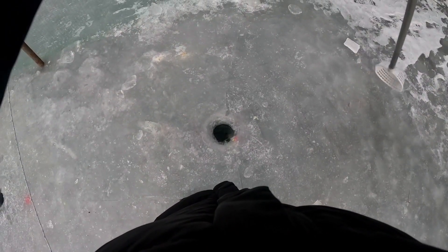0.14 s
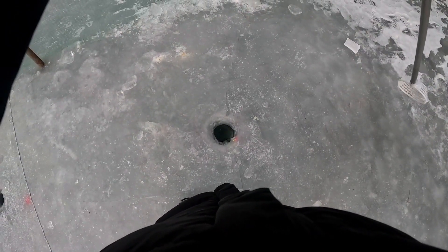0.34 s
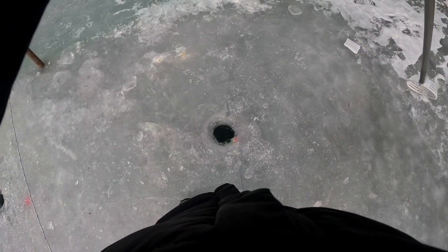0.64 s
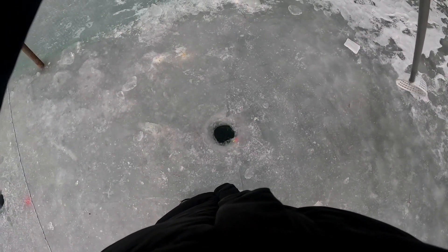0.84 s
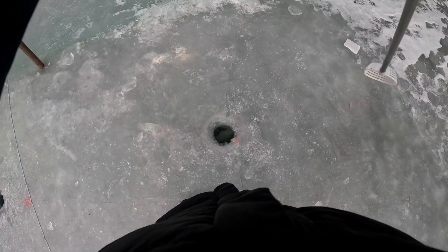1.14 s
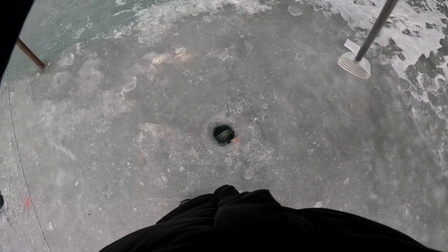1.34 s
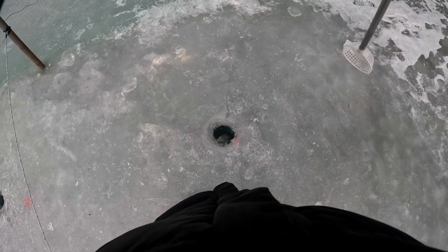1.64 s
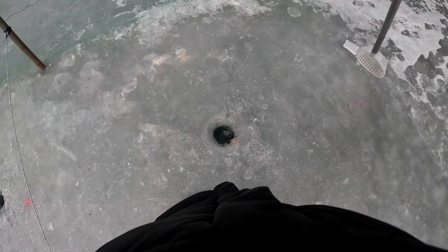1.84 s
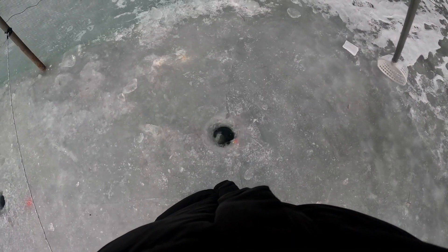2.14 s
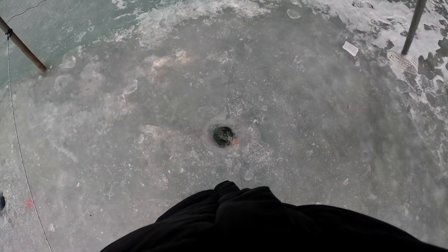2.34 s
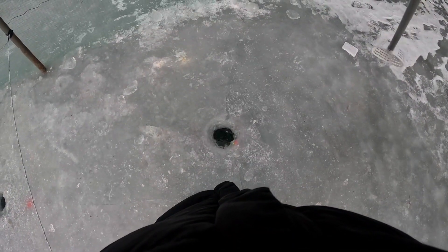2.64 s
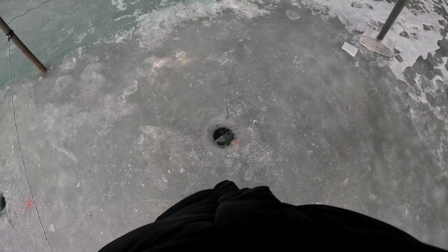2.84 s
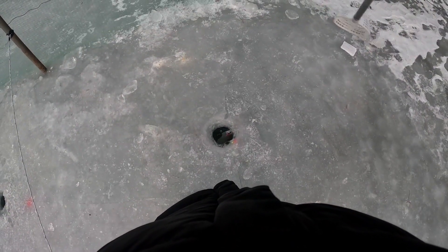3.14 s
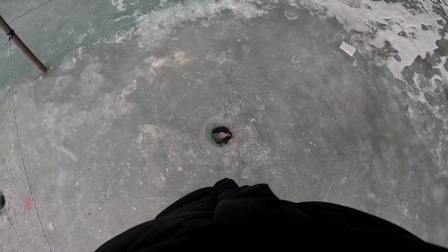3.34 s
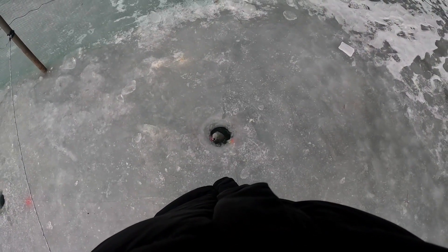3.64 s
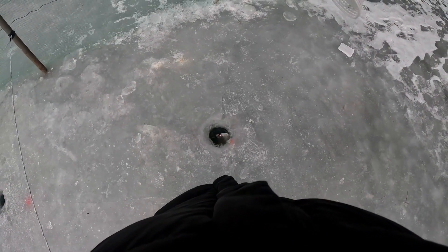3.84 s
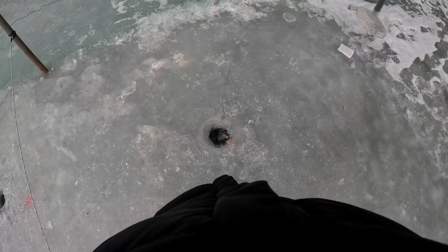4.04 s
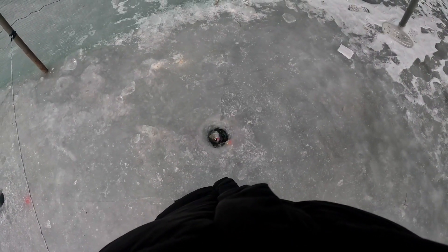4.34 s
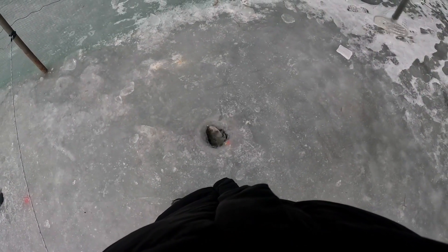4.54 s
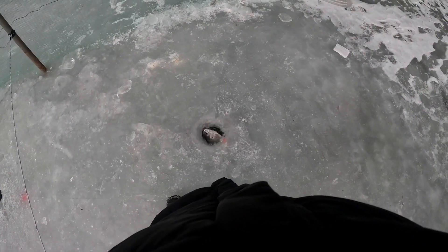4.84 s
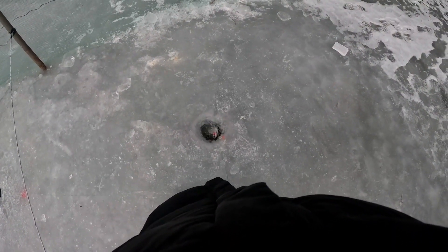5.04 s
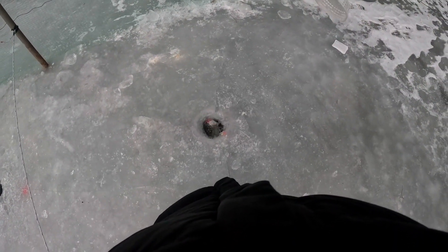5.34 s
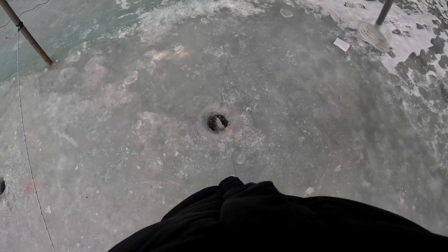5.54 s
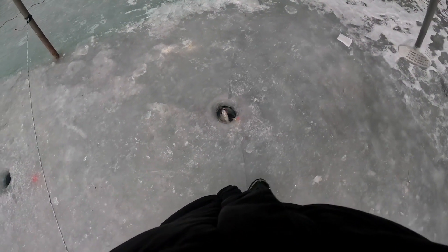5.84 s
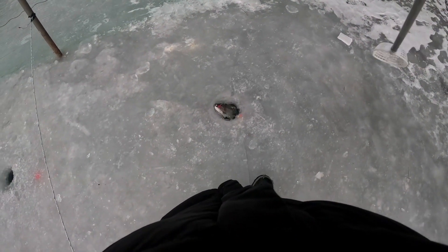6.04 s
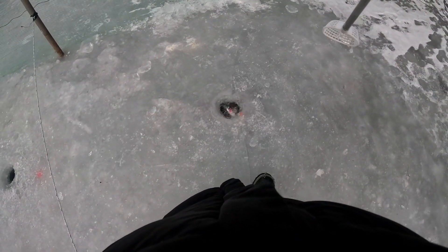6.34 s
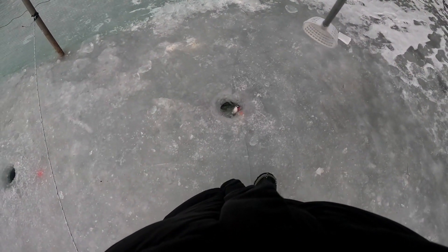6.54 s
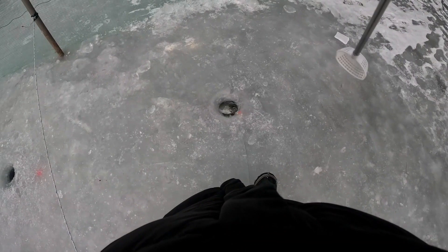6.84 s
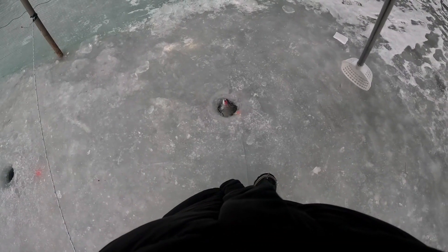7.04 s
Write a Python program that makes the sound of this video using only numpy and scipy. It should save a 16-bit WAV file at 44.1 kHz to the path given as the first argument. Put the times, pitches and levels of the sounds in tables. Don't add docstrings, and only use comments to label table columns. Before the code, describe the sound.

A fishing reel winds line in uneven, fast ticking surges while wind rumbles and faint watery blips sound from an ice hole; a knock finishes.

```python
import sys
import numpy as np
from scipy import signal
from scipy.fft import rfft, irfft, next_fast_len
from scipy.io import wavfile
from scipy.ndimage import uniform_filter1d

SR = 44100
rng = np.random.default_rng(int(sys.argv[2]) if len(sys.argv) > 2 else 0)


def level_to_linear(level):
    exponent = np.asarray(level, float) / 20
    return 10 ** exponent


def log_audio(samples):
    frames = np.atleast_2d(samples).T
    limited = np.clip(frames, -1, 1)
    pcm = np.round(limited * 32767).astype(np.int16)
    wavfile.write(sys.argv[1], SR, pcm)


N = 316638


def resonance(x, hz, width_hz):
    return signal.lfilter(*signal.iirpeak(hz, hz / width_hz, fs=SR), x)


def ring(x, hz, width_hz):
    for _ in range(3):
        x = resonance(x, hz, width_hz)
    return x


def lowpass(x, hz):
    return signal.sosfiltfilt(signal.butter(3, hz, fs=SR, output="sos"), x)


def unit(x):
    return x / np.sqrt(np.mean(x ** 2))


def even(x, window_s):
    return unit(x / (0.24 + np.sqrt(uniform_filter1d(x ** 2, int(window_s * SR)))))


def curves(table):
    s, *columns = np.transpose(table)
    return [np.interp(np.arange(N) / SR, s, c) for c in columns]


def lumps(at_s, length_s):
    s = np.arange(0, N + 100, 100) / SR
    return np.exp(-((s - np.c_[at_s]) / np.c_[length_s]) ** 2)


def smooth(x):
    return np.interp(np.arange(N), 100 * np.arange(len(x)), x)


def swells(table, rest_db):
    s, db, length_s = np.transpose(table)
    power = level_to_linear(2 * db) @ lumps(s, np.maximum(length_s, .01)) ** 2
    return smooth(10 * np.log10(power + level_to_linear(2 * rest_db)))


def coloured(spectrum):
    hz, db = np.transpose(spectrum)
    size = next_fast_len(N)
    bins = np.fft.rfftfreq(size, 1 / SR) + 1
    gain = level_to_linear(np.interp(np.log(bins), np.log(hz), db, left=-90, right=-90))
    return unit(irfft(rfft(rng.standard_normal(size)) * gain, size)[:N])


def walk(rate_hz):
    k = int(SR / rate_hz)
    held = np.repeat(rng.standard_normal(N // k + 1), k)
    return unit(uniform_filter1d(uniform_filter1d(held, k), k)[:N])


def pair(mid, side, pan_db):
    return np.array([level_to_linear(pan_db / 2) * (mid + side), level_to_linear(-pan_db / 2) * (mid - side)])


def bursts(at, size, fall_s, rise_s):
    kicks = np.zeros(N)
    kicks[at] = size
    s = np.arange(600) / SR
    shape = np.exp(-s / fall_s) * (1 - np.exp(-s / rise_s))
    return signal.oaconvolve(kicks, shape)[:N] * rng.standard_normal(N)


# (frequency [Hz], level [dB per Hz])
AIR_SPECTRUM = [(2000, 2.5), (2600, 9), (5200, 4.5), (9300, -1.5), (10200, -37), (11600, -43), (13000, -14),
                (15000, -27), (16000, -60)]
AIR_DB = -71


def air():
    return pair(coloured(AIR_SPECTRUM), 1.07 * coloured(AIR_SPECTRUM), .5) * level_to_linear(AIR_DB)


# (frequency [Hz], level [dB per Hz])
BUFFET_SPECTRUM = [(12, -39), (18, 2), (25, 4), (33, 0), (42, -7), (55, -40), (90, -50), (200, -120)]
# (time [s], level [dB], length [s])
GUSTS = [(0.0, -31.5, 0.025), (0.13, -31, 0.086), (0.37, -33.5, 0.048), (0.56, -39, 0.051),
         (0.83, -25, 0.034), (1.07, -33, 0.055), (1.24, -47, 0.037), (1.38, -30.5, 0.075),
         (1.55, -30.5, 0.074), (1.8, -49, 0.05), (1.94, -50, 0.054), (2.04, -47, 0.068), (2.25, -32, 0.048),
         (2.49, -39, 0.077), (2.69, -38, 0.052), (2.83, -40.5, 0.061), (2.96, -25, 0.046),
         (3.2, -31.5, 0.039), (3.36, -42.5, 0.047), (3.68, -31.5, 0.071), (3.92, -37.5, 0.057),
         (4.09, -44, 0.034), (4.4, -31.5, 0.06), (4.55, -39.5, 0.077), (4.63, -40, 0.033), (4.98, -39, 0.1),
         (5.12, -26.5, 0.039), (5.35, -33, 0.059), (5.47, -46, 0.06), (5.55, -57, 0.054),
         (5.84, -28.5, 0.049), (5.98, -28.5, 0.079), (6.08, -27, 0.061), (6.28, -33, 0.075),
         (6.44, -38, 0.044), (6.61, -26.5, 0.045), (6.91, -60, 0.05), (7.0, -44.5, 0.015)]
LULL_DB = -49.5


def buffet():
    lump = lowpass(even(coloured(BUFFET_SPECTRUM), .06), 50)
    return pair(lump, 0.0092 * coloured(BUFFET_SPECTRUM), -0.27) * level_to_linear(swells(GUSTS, LULL_DB) + 1.0)


# (time [s], level [dB], length [s])
PUFFS = [(0.03, -50.5, 0.1), (0.37, -50.5, 0.23), (0.63, -52, 0.059), (0.79, -51, 0.082),
         (1.24, -56.5, 0.3), (1.52, -56.5, 0.12), (1.65, -54, 0.057), (1.77, -51.5, 0.036),
         (1.94, -50.5, 0.065), (2.08, -62, 0.018), (2.27, -45.5, 0.024), (2.46, -55, 0.53),
         (2.65, -49, 0.029), (2.93, -60.5, 0.29), (3.33, -50.5, 0.092), (3.67, -59, 0.058),
         (3.93, -58, 0.072), (4.34, -50.5, 0.035), (4.42, -44.5, 0.032), (4.62, -50, 0.2),
         (4.69, -57, 0.027), (5.07, -54.5, 0.057), (5.34, -57, 0.093), (5.71, -48, 0.023),
         (5.95, -56, 0.27), (6.39, -51, 0.032), (6.54, -52.5, 0.31), (6.54, -49, 0.045), (6.82, -45, 0.034),
         (7.01, -53.5, 0.15)]
CALM_DB = -61


def puff_db():
    return swells(PUFFS, CALM_DB)


# (frequency [Hz], level [dB per Hz])
FLUTTER_SPECTRUM = [(50, -43), (81, -15), (113, -17.5), (150, -14), (220, -16.5), (310, -30.5),
                    (367, -36.5), (500, -42), (650, -81), (1100, -120)]


def flutter():
    grain = level_to_linear(3.8 * walk(55))
    mid = unit(grain * coloured(FLUTTER_SPECTRUM))
    side = 0.13 * grain * coloured(FLUTTER_SPECTRUM)
    return pair(mid, side, 0.19) * level_to_linear(puff_db() + 0.8)


# (frequency [Hz], level [dB per Hz])
HISS_SPECTRUM = [(180, -39), (300, -8), (361, -12), (626, -10.5), (856, -8), (1090, 5.5), (1270, -2),
                 (1660, -8), (1920, -7.5), (2350, -16.5), (2700, -20.5), (3510, -14), (5940, -120)]
# (time [s], level [dB], length [s])
RUSTLES = [(0, -69, 0.035), (.28, -64, 0.033), (.76, -61, 0.036), (.93, -69, 0.046), (1.19, -70.5, 0.066),
           (1.78, -67, .13), (2.26, -65.5, 0.082), (3.3, -74, 0.061), (4.71, -67, 0.2), (5.25, -63.5, 0.11),
           (6.31, -67, 0.071), (6.47, -56, 0.046), (6.58, -57, 0.11)]
HISS_DB, HISS_FOLLOWS = -64.5, 0.17


def hiss():
    wind_db = HISS_DB + HISS_FOLLOWS * (puff_db() - CALM_DB)
    level = np.hypot(level_to_linear(wind_db + 0.47), level_to_linear(swells(RUSTLES, -90)))
    mid = unit(level_to_linear(1.45 * walk(25.97)) * coloured(HISS_SPECTRUM))
    return pair(mid, .5 * coloured(HISS_SPECTRUM), 1.3) * level


# (frequency [Hz], level [dB per Hz])
SWAY_SPECTRUM = [(3, -22.5), (6, -0.5), (14, -1), (19, -25.5), (30, -72)]
SWAY_DB = -35
# (frequency [Hz], level [dB per Hz])
THUD_SPECTRUM = [(33, -50), (44, 0), (56, -8), (70, -14.5), (90, -21), (115, -32.5), (140, -51), (200, -90)]
# (time [s], level [dB], length [s])
THUDS = [(0.0, -47, 0.025), (0.07, -43, 0.035), (0.19, -44, 0.033), (0.36, -52, 0.069), (0.49, -56, 0.039),
         (0.57, -47, 0.05), (0.82, -42.5, 0.036), (0.92, -57, 0.054), (1.06, -50, 0.068),
         (1.18, -52, 0.038), (1.26, -58, 0.049), (1.39, -55, 0.031), (1.5, -44, 0.028), (1.66, -53, 0.039),
         (1.79, -51, 0.04), (1.95, -54, 0.03), (2.25, -47, 0.061), (2.48, -43.5, 0.029), (2.64, -45, 0.037),
         (2.94, -43, 0.042), (3.19, -52, 0.036), (3.28, -56, 0.031), (3.63, -43, 0.033), (3.79, -59, 0.04),
         (3.93, -52, 0.054), (4.35, -47, 0.051), (4.68, -45, 0.033), (4.8, -50, 0.043), (5.01, -52, 0.03),
         (5.1, -40.5, 0.034), (5.35, -48, 0.041), (5.72, -49, 0.037), (5.82, -41, 0.051),
         (6.05, -31.5, 0.044), (6.22, -51, 0.059), (6.41, -49, 0.047), (6.58, -39, 0.045),
         (6.81, -47, 0.029), (6.92, -58, 0.035), (7.0, -53, 0.021)]
STILL_DB = -60


def eddies():
    thud = even(coloured(THUD_SPECTRUM), 0.029) * level_to_linear(swells(THUDS, STILL_DB) + 1.0)
    low = thud + coloured(SWAY_SPECTRUM) * level_to_linear(SWAY_DB - 1)
    return pair(low, 0.031 * np.roll(thud, 300), -0.17)


# (time [s], peak [dB], frequency [Hz], glide [share in 15 ms])
BLIPS = [(.678, -50, 1057, 0.082), (1.637, -51, 980, 0.047), (2.638, -36.5, 1078, 0.26),
         (2.652, -54, 1330, .35), (3.278, -50.5, 1140, -0.12), (3.329, -52, 1160, -0.046),
         (4.252, -47.5, 1246, 0), (4.708, -45, 1113, -0.0082), (5.008, -60, 1460, .75),
         (5.012, -56, 1120, 0.062), (5.112, -64, 1850, .45), (5.04, -61, 1910, .15),
         (5.053, -55, 1480, 0.6), (5.078, -47, 1085, .35), (5.128, -50, 935, 0.31), (5.2, -48, 1140, 0.19),
         (5.221, -42.5, 1200, 0.17), (5.222, -51, 1830, .25), (5.24, -52, 1500, .14),
         (5.24, -53, 1950, .065), (5.284, -54, 1600, 0.29), (5.318, -53, 1750, .6),
         (5.337, -41.5, 1300, -0.17), (5.353, -49, 1170, -.1), (5.639, -52, 1170, -.03),
         (5.68, -56, 1090, .2), (5.73, -59, 1340, .17), (5.772, -56, 1890, .22), (5.78, -54, 1500, .16),
         (6.191, -56, 1090, 0.066), (6.309, -49, 1090, -0.0035), (6.465, -44, 1270, .03),
         (6.645, -53, 1150, .05), (6.93, -55, 1550, .095), (7.031, -48, 1085, .093),
         (7.06, -34.5, 1152, 0.012)]
BLIP_CYCLES = 59
BIG_PAN_DB, SMALL_PAN_DB, SMALL_HZ = 3, -12.5, 1410


def blips():
    out, s = np.zeros((2, N + 4000)), np.arange(4000) / SR
    for t, db, hz, glide in BLIPS:
        t60_s = BLIP_CYCLES / hz
        pan_db = BIG_PAN_DB + (SMALL_PAN_DB - BIG_PAN_DB) / (1 + (SMALL_HZ / hz) ** 12)
        fade = np.exp(-np.log(1000) * (s / max(0.53 * t60_s, .01)) ** 2)
        gurgle = unit(signal.oaconvolve(rng.standard_normal(4000), np.hanning(160), "same"))
        shape = (1 - np.exp(-s / 0.0023)) * fade * level_to_linear(2.1 * gurgle)
        sine = np.sin(2 * np.pi * hz * (s + glide * s ** 2 / 0.0334))
        tone = level_to_linear(db) * shape / shape.max() * sine
        i = int(t * SR)
        out[:, i:i + 4000] += pair(tone, 0.28 * np.roll(tone, 9), pan_db)
    return out[:, :N]


# (time [s], peak [dB], left minus right [dB])
CREAKS = [(0.004, -47, -3), (0.665, -54, -2), (0.68, -52, -2), (0.77, -49.5, -2), (4.33, -58, -2),
          (4.689, -61, 1.0), (5.702, -53, -1.5), (5.903, -44.5, 2), (5.952, -42, 2), (5.977, -51, 1.5),
          (5.993, -37.5, 4), (6.016, -38.5, 3), (6.035, -30, 2), (6.404, -53, 1.0), (6.464, -56, -5),
          (6.577, -46, -5), (6.646, -54, 0), (7.104, -30, 1)]
# (frequency [Hz], width [Hz], level [dB])
JACKET_MODES = [(584, 270, -4.5), (757, 172, -6), (1200, 313, 6.1), (1500, 480, -14), (2100, 450, -34)]


def jacket():
    out, s = np.zeros((2, N + 3000)), np.arange(3000) / SR
    for t, db, pan_db in CREAKS:
        slip = 0.021 * np.exp(-s / 0.0077) * rng.standard_normal(3000)
        slip[40] += 1
        slip = signal.oaconvolve(slip, np.hanning(22), "same")
        knock = 0
        for hz, width, mode_db in JACKET_MODES:
            mode = resonance(resonance(slip, hz, 1.5 * width), hz, 1.5 * width)
            knock = knock + level_to_linear(mode_db) * mode * 300 / width
        late = 0.53 * signal.hilbert(knock).imag
        i = int(t * SR)
        out[:, i:i + 3000] += pair(knock, late, pan_db) * level_to_linear(db + 2.5) / np.abs(knock).max()
    return out[:, :N]


# (frequency [Hz], t60 [s], swing [ratio])
ROCK = [(165, .018, 1), (160, .06, .07), (42, .12, -.13), (27, .2, .12)]
BUMP_S, BUMP_DB = 7.1057, -7.3


def bump():
    s = np.maximum(np.arange(N) / SR - BUMP_S, 0)
    rock = 0
    for hz, t60_s, swing in ROCK:
        rock = rock + swing * np.exp(-np.log(1000) * s / t60_s) * np.sin(2 * np.pi * hz * s)
    rock = lowpass(rock * (1 - np.exp(-s / .0015)), 290)
    rock = level_to_linear(BUMP_DB) * rock / np.abs(rock).max()
    return pair(rock, 0.052 * np.roll(rock, 60), -0.22)


# (frequency [Hz], width [Hz], level [dB])
RUBS = [(3200, 390, -75.5), (4910, 300, -79.5), (5550, 810, -81.5)]


def gear_rub(speed):
    grit = rng.standard_normal((2, N)) * (speed / 66) ** 1.5
    out = 0
    for hz, width, db in RUBS:
        out = out + level_to_linear(db) * unit(resonance(resonance(grit, hz, width), hz, width))
    return out


# (time [s], level [dB], length [s])
LOW_RING = [(0.14, -54.5, 0.37), (0.26, -40.5, 0.016), (0.58, -44.5, 0.019), (0.67, -57.5, 0.16),
            (0.96, -52, 0.069), (1.27, -55, 0.14), (1.53, -56.5, 0.1), (1.8, -50.5, 0.083),
            (2.11, -58, 0.32), (2.21, -49.5, 0.021), (2.57, -46.5, 0.04), (2.94, -60.5, 0.21),
            (2.94, -52, 0.018), (3.42, -60, 0.088), (3.75, -55, 0.065), (4.1, -63, 0.13), (4.47, -64, 0.11),
            (4.7, -55, 0.036), (4.86, -56.5, 0.028), (5.14, -60.5, 0.069), (5.43, -57.5, 0.05),
            (5.77, -57.5, 0.058), (6.0, -61, 0.031), (6.32, -57.5, 0.025), (6.56, -64, 0.2),
            (6.84, -52.5, 0.019), (7.2, -52.5, 0.2)]
# (time [s], level [dB], length [s])
HIGH_RING = [(0.13, -71.5, 0.211), (0.27, -58.5, 0.021), (0.53, -74, 0.058), (0.71, -69.5, 0.069),
             (1.32, -75, 0.33), (1.65, -65.5, 0.032), (1.91, -62, 0.039), (2.27, -63.5, 0.39),
             (2.56, -58, 0.025), (2.83, -63, 0.025), (3.04, -70.5, 0.3), (3.4, -61.5, 0.033),
             (3.55, -63, 0.06), (3.81, -67.5, 0.032), (3.91, -70, 0.022), (4.01, -71, 0.038),
             (4.63, -69, 0.36), (5.18, -73, 0.045), (5.69, -71.5, 0.51), (6.3, -71, 0.075),
             (6.52, -62.5, 0.024), (6.75, -74, 0.23), (6.99, -61.5, 0.028), (7.2, -65, 0.13)]
LOW_HELD_DB, HIGH_HELD_DB, GRIP_WANDER_DB = -74, -80, 3


def grip():
    low = swells(LOW_RING, LOW_HELD_DB) + 2.0 + GRIP_WANDER_DB * walk(25)
    high = swells(HIGH_RING, HIGH_HELD_DB) + 2.0 + GRIP_WANDER_DB * walk(25)
    return [low, high]


RING_HZ = [6312, 6408, 9428, 9605, 13752, 14393, 14580]
# (t60 [s], level [dB], low ring 0 or high ring 1 [whole part], left minus right [dB])
RINGS = [(0.092, 10, 0, -0.8), (0.11, -2, 0, -7), (0.17, 8, 1, 0.6), (0.12, -6.5, 1, 6.5),
         (0.16, -31, 0.82, 1), (0.11, -24, 1, 18), (.12, -25, 1, -9)]


def spool_rings(at):
    free_db = grip()
    out, s = np.zeros((2, N)), np.arange(N) / SR
    at = np.r_[0, at]
    last = np.searchsorted(at, np.arange(N), side="right") - 1
    for hz, (t60_s, db, column, pan_db) in zip(RING_HZ, RINGS):
        size_luck, phase_luck, ear_luck = rng.standard_normal((3, len(at)))
        freed_db = free_db[int(column)][np.minimum(at + 300, N - 1)]
        size = level_to_linear(db + freed_db + 2.6 * size_luck)
        fade = np.exp(-np.log(1000) * (s - s[at][last]) / t60_s)
        phase = np.cumsum(1.303 * phase_luck)
        for ear, slip in enumerate((0.1 * ear_luck, -.14 * ear_luck)):
            swing = (size * np.exp(1j * (phase + slip)))[last] * fade
            swing = signal.oaconvolve(swing, np.hanning(120) / 60)[:N]
            out[ear] += level_to_linear(pan_db * (1.0 - ear)) * (swing * np.exp(2j * np.pi * hz * s)).imag
    return out


# (time [s], level [dB])
SNAP_DRIFT = [(0, .5), (1.0, 0), (1.6, -1.5), (2.5, 1.5), (2.9, -2), (3.4, 0), (4.1, -1.5), (4.9, 0.5),
              (5.4, -1.5), (6.2, -2.5), (7.18, 1)]
SLOW_SNAP_DB = 0.5
# (time [s], frame [dB], cover [dB], pawl [dB])
PART_LEVELS = [(0.0, 2.5, 2, 2.5), (0.15, -4.5, -5, 2), (0.31, 2.5, 2, -0.2), (0.46, -4, 0, 3.5),
               (0.61, 2.7, 1, 1.5), (0.76, -4, 1, 1), (0.92, -0.2, -0.5, 2.5), (1.07, 5, 1.5, -0.5),
               (1.22, -0.5, 0, 1), (1.37, 3.2, 3.5, 0.5), (1.53, 2, 3.5, 3.3), (1.68, -1.5, -2, -4.5),
               (1.83, 1.2, -1.5, -3), (1.98, -5, 2, 3.5), (2.14, -4.5, -2.5, -0.5), (2.29, 2, -1, -0.5),
               (2.44, -8, -3.5, -4), (2.59, 1.5, -0.5, 3.5), (2.75, -8.9, 1, -2.4), (2.9, 2, 1, 4.6),
               (3.05, -7.5, 0, 0.5), (3.2, -4.5, 0.5, -1), (3.36, -2, -0.0, 2.2), (3.51, 1.7, 1.2, -6.5),
               (3.66, -0.5, -2.5, -1.5), (3.81, 5, 2, -1.5), (3.97, -1, -2, -7), (4.12, 2, -2, 3),
               (4.27, 5, -2, 0.3), (4.42, -0.5, 1.5, 0), (4.58, 1, -1.1, -2.5), (4.73, -2, -0.5, -2),
               (4.88, -1.5, -3.5, -0.5), (5.03, -5, -1.5, 1.7), (5.19, 0, -1, 0), (5.34, -3.5, 0, 2),
               (5.49, 3, 2.5, -1), (5.64, -3.5, 0.5, 3.2), (5.8, 4.5, 6, 2.5), (5.95, 2.3, -1.5, 1.7),
               (6.1, 2.5, 2, 0.2), (6.25, 2.2, -7.1, 2.5), (6.41, -2, -1, 0), (6.56, 3.5, 3, 2.5),
               (6.71, -0.5, 0.5, 2), (6.86, 2.5, 1, 1.5), (7.02, -3, 1, 2.5), (7.17, 0.5, -1, 2)]
PART_EDGES_HZ = [3600, 6700]
# (time [s], low share [0-1])
TILT = [(0, 0.07), (1.7, .15), (2.0, .0), (3.2, 0.15), (3.6, 0.76), (4.9, 0.94), (5.3, 0.46), (5.9, 0.77),
        (6.5, 0.56), (7.18, 0.3)]
SPRING, SPRING_DROP_HZ = 4, 170
# (frequency [Hz], width [Hz], level [dB],
# once-a-turn swing [dB], its angle [turns], twice-a-turn swing [dB], its angle [cycles],
# left minus right [dB], unlike share [0-1])
BODY = [(3002, 240, -48.5, 3.56, -0.035, .4, 0.0012, -3.5, 0.73),
        (3183, 210, -46, 3.5, -0.18, 0.42, -0.31, -4, 0.17),
        (3907, 367, -46.5, 2.7, 0.51, 2.3, -.26, -1, 0.14),
        (6400, 570, -41.5, 1.4, -0.23, 2, -0.58, -1.5, 0.13),
        (7100, 360, -39.5, 1.9, 0.26, 5.14, 0.31, 5, .3),
        (7750, 297, -41.5, 0.7, -0.23, 5.6, 0.45, 6.5, 0.38),
        (8600, 660, -48.5, .3, .3, 2.1, 0.58, 7, 0.48), (11600, 940, -58, 1.2, -0.099, 1.1, .3, 6.5, 0.7)]
# (frequency [Hz], width [Hz], depth [0-1])
GAPS = [(3570, 220, 0.67), (5300, 260, 0.2)]
TEETH_PER_TURN = 18.08


def body_ticks(speed, teeth, at):
    turn = np.round(teeth[at]) / TEETH_PER_TURN
    snap_db = curves(SNAP_DRIFT)[0][at] + SLOW_SNAP_DB * (66 - speed[at]) / 50
    snap_db = snap_db + .8 * rng.standard_normal(len(at))
    parts_db, tilt = curves(PART_LEVELS), curves(TILT)[0]
    out, opposed = 0, 0
    for row, (hz, width, db, once_db, once, twice_db, twice, pan_db, unlike) in enumerate(BODY):
        swing_db = once_db * np.cos(2 * np.pi * (turn - once))
        swing_db = swing_db + twice_db * np.cos(2 * np.pi * (2 * turn - twice))
        part_db = parts_db[np.searchsorted(PART_EDGES_HZ, hz)][at]
        size = level_to_linear(db + swing_db + snap_db + part_db + 1.54 * rng.standard_normal(len(at)))
        chatter = 0.12 * bursts(at, size, .0018, 0.00024)
        running = level_to_linear(db - 40.5) * (0.36 + speed / 110) * rng.standard_normal(N)
        mid = chatter + running
        mid[at + 8] += size
        if row == SPRING:
            low = ring(np.sqrt(tilt) * mid, hz - SPRING_DROP_HZ, 2.23 * width)
            high = ring(np.sqrt(1 - tilt) * mid, hz + SPRING_DROP_HZ, 2.23 * width)
            mid = low + high
        else:
            mid = ring(mid, hz, 2.19 * width)
        mid = mid * (SR / width) * level_to_linear(-16.5)
        out = out + pair(mid, 0, pan_db)
        opposed = opposed + pair(0, unlike * np.roll(mid, 3), pan_db)
    out = out + opposed * (1 + 0.48 * walk(55))
    for hz, width, depth in GAPS:
        out = out - depth * resonance(out, hz, width)
    return out


# (start [s], teeth wound [count], slack speed at start [teeth/s],
# share of push speeding up [0-1])
STROKES = [(-0.229, 25.37, 25.7, 0.49), (0.065, 7.52, 54.4, 0.35), (0.194, 9.04, 73.0, 0.47),
           (0.337, 18.47, 27.7, 0.8), (0.653, 8.7, 39.7, 0.14), (0.833, 14.57, 34.9, 0.61),
           (1.057, 10.54, 38.3, 0.08), (1.271, 8.15, 44.7, 0.92), (1.404, 20.47, 51.0, 0.69),
           (1.656, 12.49, 12.3, 0.61), (1.965, 8.38, 33.9, 0.92), (2.172, 14.12, 62.8, 0.71),
           (2.484, 13.11, 45.1, 0.49), (2.691, 3.82, 34.4, 0.35), (2.806, 9.71, 46.6, 0.92),
           (2.997, 11.83, 38.6, 0.43), (3.315, 18.07, 44.6, 0.51), (3.656, 18.27, 23.4, 0.41),
           (3.997, 18.29, 29.3, 0.67), (4.346, 8.19, 28.2, 0.64), (4.499, 14.25, 88.5, 0.41),
           (4.749, 9.91, 45.4, 0.25), (4.954, 7.99, 24.1, 0.49), (5.134, 11.5, 77.0, 0.19),
           (5.298, 16.32, 31.9, 0.52), (5.578, 13.6, 40.8, 0.6), (5.796, 8.82, 76.3, 0.24),
           (5.94, 17.06, 64.9, 0.4), (6.145, 9.83, 45.6, 0.24), (6.337, 15.67, 30.0, 0.92),
           (6.588, 10.6, 44.2, 0.5), (6.785, 7.83, 69.1, 0.24), (6.91, 11.6, 22.3, 0.92),
           (7.12, 9.42, 50.7, 0.08), (7.272, 20.04, 44.8, 0.33)]


def crank():
    start, teeth, slack, share = np.transpose(STROKES)
    length, share = np.diff(start), share[:-1]
    top = 2 * teeth[:-1] / length - share * slack[:-1] - (1 - share) * slack[1:]
    knots = np.r_[np.c_[start[:-1], start[:-1] + share * length].ravel(), start[-1]]
    speeds = np.r_[np.c_[slack[:-1], top].ravel(), slack[-1]]
    place = np.interp(np.arange(N) / SR, knots, np.arange(len(knots)))
    eased = np.floor(place) + np.sin(np.pi / 2 * (place % 1)) ** 2
    return np.interp(eased, np.arange(len(knots)), speeds)


def reel():
    speed = crank()
    teeth = np.cumsum(speed) / SR - .025
    at = np.flatnonzero(np.diff(np.floor(teeth)))
    return spool_rings(at) + body_ticks(speed, teeth, at) + gear_rub(speed)


def scene():
    wind = air() + buffet() + flutter() + hiss() + eddies()
    return wind + blips() + jacket() + bump() + reel()


def roll_off(x):
    return signal.sosfilt(signal.butter(12, 15000, fs=SR, output="sos"), x)


def record(dry):
    return roll_off(dry)


dry = scene()
out = record(dry)
log_audio(out)
```